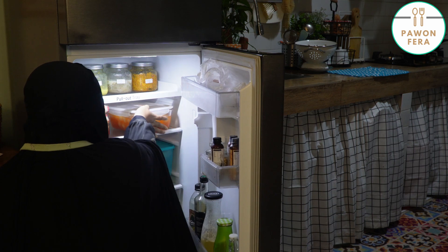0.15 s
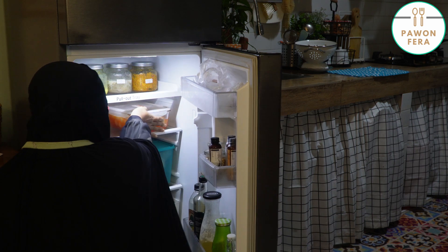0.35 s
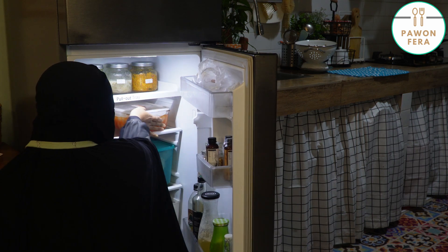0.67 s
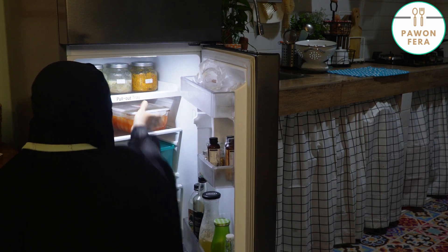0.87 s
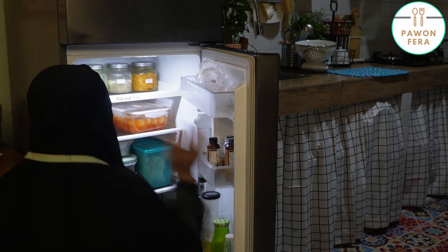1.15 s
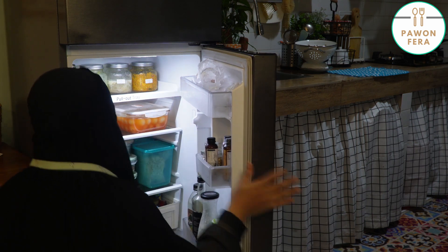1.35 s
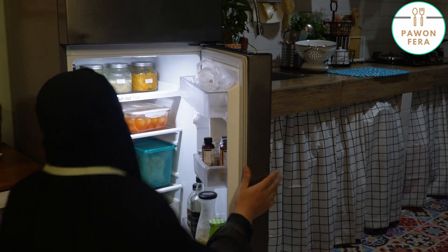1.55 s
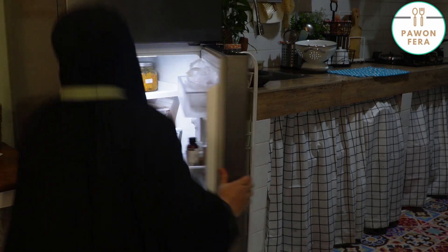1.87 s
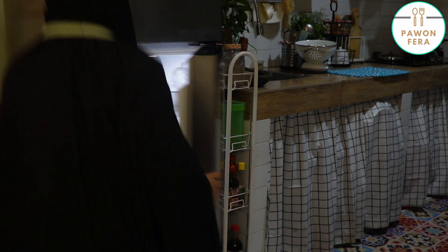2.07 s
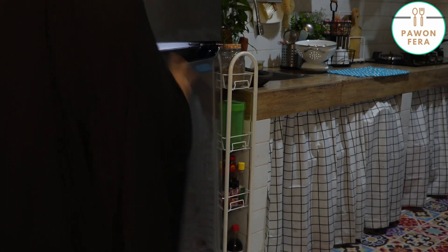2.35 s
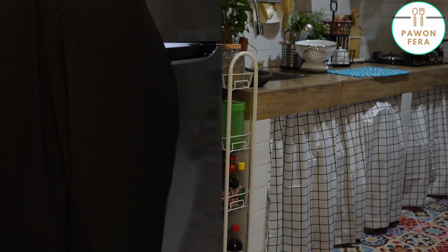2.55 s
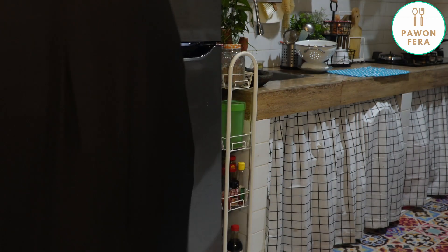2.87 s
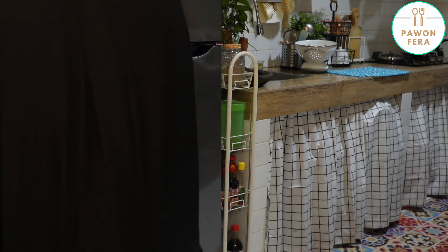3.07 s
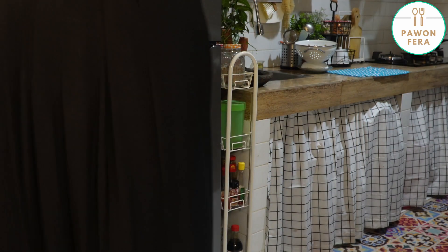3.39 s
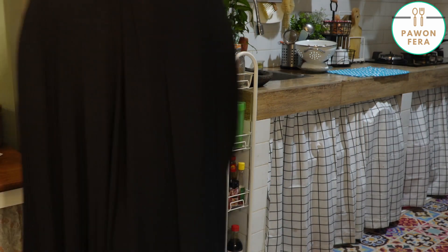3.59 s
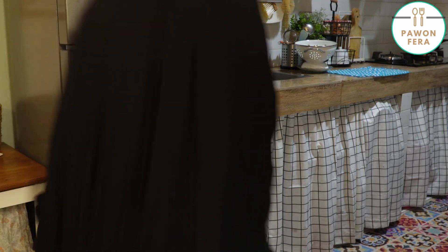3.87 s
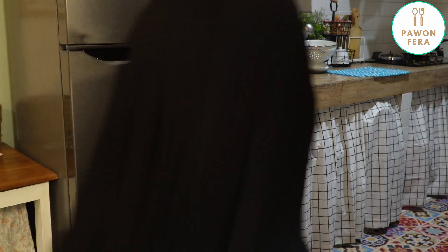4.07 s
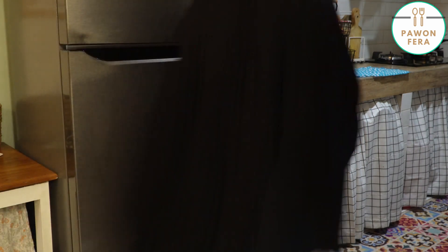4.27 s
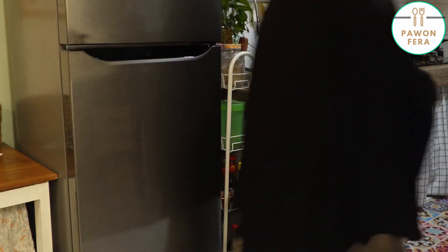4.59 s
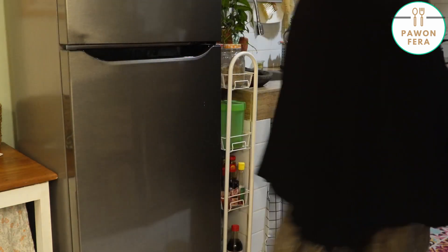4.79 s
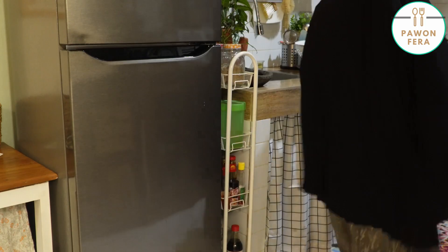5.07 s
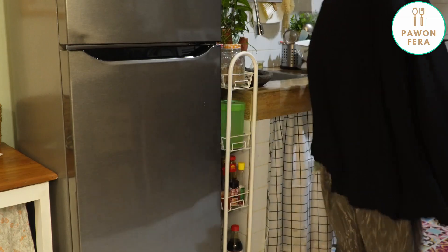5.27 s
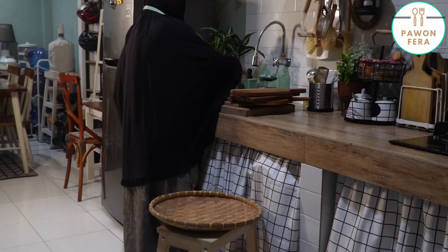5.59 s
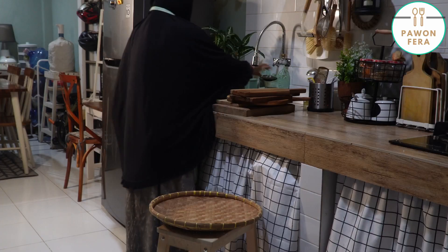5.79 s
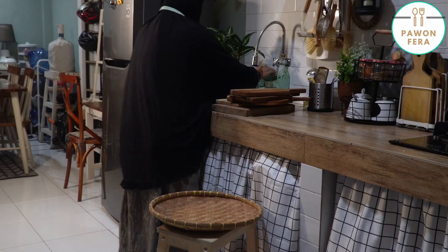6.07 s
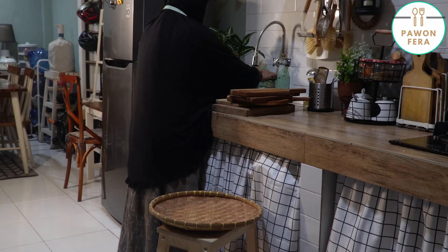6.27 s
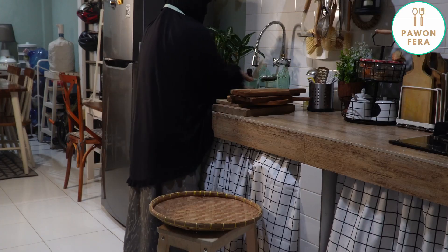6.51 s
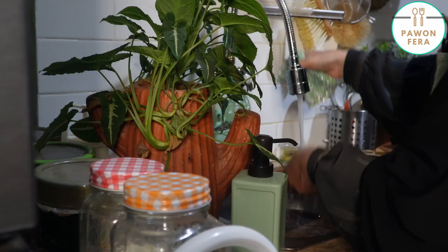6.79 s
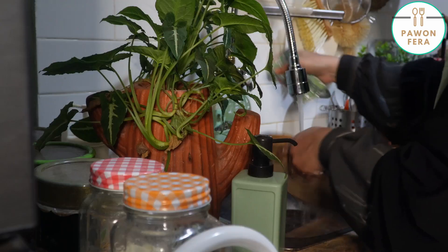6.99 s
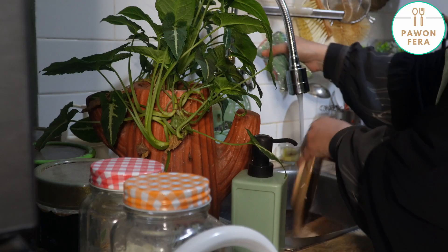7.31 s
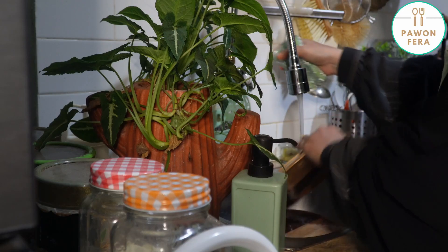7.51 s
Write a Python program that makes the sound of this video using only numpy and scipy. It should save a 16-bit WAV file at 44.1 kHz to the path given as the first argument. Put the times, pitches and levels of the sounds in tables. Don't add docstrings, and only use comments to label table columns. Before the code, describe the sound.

A plastic box knocks into a fridge, the door thuds shut, slippers scuff over kitchen tiles, then tap water runs and a wooden board knocks the sink.

```python
import sys
import numpy as np
from scipy import signal
from scipy.fft import rfft, irfft
from scipy.io import wavfile
from scipy.ndimage import uniform_filter1d

SR = 44100
rng = np.random.default_rng(int(sys.argv[2]) if len(sys.argv) > 2 else 0)


def invert_db(level):
    return 10 ** (np.asarray(level, dtype=float) / 20)


def materialize(psi):
    bounded = np.clip(np.atleast_2d(psi).T, -1, 1)
    quanta = np.round(bounded * 32767).astype(np.int16)
    wavfile.write(sys.argv[1], SR, quanta)


N = 337365
TIME = np.arange(N) / SR
DOOR_S, WIDE_S, SINK_S, END_S = 2.74, 5.47, 6.788, 7.65


def along(table, hz):
    points, values = np.transpose(table)
    return np.interp(np.log(np.maximum(hz, 1)), np.log(points), values)


def colour(x, table):
    size = 4096
    gain = invert_db(along(table, np.fft.rfftfreq(size, 1 / SR)))
    cepstrum = irfft(np.log(gain))
    cepstrum[1:size // 2] *= 2
    cepstrum[size // 2 + 1:] = 0
    response = irfft(np.exp(rfft(cepstrum)))
    return signal.fftconvolve(x, response)[:len(x)]


def band(x, hz, width):
    return signal.lfilter(*signal.iirpeak(min(hz, .45 * SR), hz / width, fs=SR), x)


def between(x, low_hz, high_hz):
    edges = [low_hz, min(high_hz, .49 * SR)]
    return signal.sosfilt(signal.butter(2, edges, "band", fs=SR, output="sos"), x)


def unit(x):
    return x / np.sqrt(np.mean(x ** 2) + 1e-30)


def walk(rate, count=N):
    hold = int(SR / rate)
    steps = np.repeat(rng.standard_normal(count // hold + 1), hold)
    smooth = uniform_filter1d(uniform_filter1d(steps, hold), hold)
    return unit(smooth[:count])


def add(out, x, s):
    start = int(s * SR)
    part = out[..., start:start + x.shape[-1]]
    part += x[..., :part.shape[-1]]


def panned(x, pan_db):
    return np.array([x * invert_db(pan_db / 2), x * invert_db(-pan_db / 2)])


def grit(rate, scatter_db):
    chance = rng.random((3, N))
    hit = chance[0] < rate / SR
    size = invert_db(-scatter_db * np.log(1.003 - chance[2]))
    return unit(hit * np.sign(chance[1] - .5) * size)


# pitch_hz, side_minus_mid_db
WIDTH = [(60, -21), (250, -20), (500, -15.5), (1000, -14), (2000, -12), (4000, -9), (8000, -6),
         (13000, -2.5)]


def spread(mid, side):
    side = colour(side, WIDTH)
    return np.array([mid + side, mid - side])


# pitch_hz, time_to_fall_60_db_s
ROOM_FADE = [(100, 0.46), (400, 0.44), (1500, 0.41), (5000, 0.38), (14000, 0.48)]


def room(send, build_s=0.00016):
    out, noise = 0, rng.standard_normal((2, N))
    build = np.exp(-1 / (build_s * SR))
    for hz in 45 * 2 ** np.arange(0, 8.7, 1 / 6):
        top_hz = hz * 2 ** (1 / 6)
        keep = 1e6 ** (-1 / (along(ROOM_FADE, hz) * SR))
        energy = between(send, hz, top_hz) ** 2
        decay = np.convolve([1, -keep], [1, -build])
        stored = signal.lfilter([(1 - keep) * (1 - build)], decay, energy)
        mid, side = unit(between(np.roll(noise, int(7 * hz), axis=1), hz, top_hz))
        field = mid + invert_db(along(WIDTH, hz)) * side * np.array([[1], [-1]])
        out = out + np.sqrt(np.abs(stored)) * field
    return out


# start_s, end_s, level_db
STILL_AIR = [
    (0, DOOR_S, -65),
    (DOOR_S, WIDE_S, -64),
    (WIDE_S, SINK_S, -62.5),
    (SINK_S, END_S, -69.5),
]
# pitch_hz, level_db (per Hz)
AIR_TONES = [
    [(15, -72), (25, -37), (248, -10), (307, -7), (371, -10), (654, -5), (1280, -2.5), (1510, -6),
     (1930, -3.5), (4450, -8), (15800, -26.5)],
    [(15, -50), (25, -33.5), (1090, 0.5), (1730, -4.5), (1980, -1), (2260, -3), (6310, -13), (15800, -26.5)],
    [(35, -61), (60, -12), (96, -25), (171, -5.5), (388, -10.5), (837, 1), (1270, 1), (1530, -2.5),
     (3160, 1.5), (15800, -24)],
]


def still_air():
    out = np.zeros((2, N))
    for (start, end, level_db), tone in zip(STILL_AIR, AIR_TONES + AIR_TONES[-1:]):
        count = int((end - start) * SR) + 1
        mid, side = (colour(rng.standard_normal(count), tone) for _ in range(2))
        level = invert_db(level_db + 0.12 * walk(17.0, count=count))
        add(out, level * unit(spread(mid, side)), start)
    return out


# pitch_hz, rms_db, waver_hz, start_s, end_s
HUM_LINES = [
    (330, -86.5, 7.77, 0.84, DOOR_S),
    (1290, -80.5, 10.4, 0.13, DOOR_S),
    (1040, -90, 10.2, 0.82, SINK_S),
    (48.4, -95.5, 0.23, WIDE_S, SINK_S),
    (147, -92.5, 7.3, WIDE_S, SINK_S),
    (861, -81.5, 25.8, WIDE_S, SINK_S),
    (1830, -91, 16, WIDE_S, SINK_S),
    (48.4, -86, .3, SINK_S, END_S),
    (158, -80, 10.9, SINK_S, END_S),
    (188, -80.5, 14.9, SINK_S, END_S),
]


def steady_hum():
    out = np.zeros(N)
    for hz, rms_db, waver_hz, start, end in HUM_LINES:
        phase = 2 * np.pi * (np.cumsum(hz + waver_hz * walk(30)) / SR + rng.random())
        level = np.sqrt(2) * invert_db(rms_db + min(.4 * waver_hz, 2) * walk(18))
        out += (TIME >= start) * (TIME < end) * level * np.sin(phase)
    return out


# start_s, length_s, pitch_hz, width_hz, level_db
RUBS = [(1.775, .06, 1800, 500, -57.5), (1.8, 0.094, 6050, 900, -51.5), (1.843, 0.051, 1500, 600, -52),
        (1.865, 0.065, 2400, 500, -62), (1.866, .25, 6300, 1200, -63.5), (1.937, .1, 1600, 600, -68.5),
        (2.075, 0.062, 2250, 500, -61.5), (2.16, .1, 2300, 900, -64), (3.547, 0.064, 2800, 1200, -54),
        (3.64, 0.026, 3500, 600, -52), (3.875, 0.036, 1710, 600, -54), (3.89, .05, 2200, 300, -58),
        (4.012, .07, 1980, 800, -57.5), (4.15, .06, 3270, 900, -53), (4.428, 0.046, 6800, 1530, -55.5),
        (4.533, 0.056, 1910, 500, -52), (4.538, 0.057, 5300, 1200, -48.5), (4.707, 0.054, 6100, 2500, -56),
        (5.021, 0.045, 7000, 3000, -52), (5.15, 0.046, 7600, 800, -54.5), (5.163, 0.043, 2940, 500, -52),
        (6.797, 0.25, 1680, 196, -64.5), (6.818, .15, 2750, 300, -59), (7.117, 0.18, 2640, 600, -46),
        (7.445, 0.3, 3270, 700, -51.5), (7.583, .07, 1730, 500, -69), (7.463, .18, 1924, 40, -58.5),
        (2.356, 0.034, 1900, 500, -62), (2.303, .1, 3200, 700, -65.5)]


def rubs():
    out, grains = np.zeros((2, N)), np.array([grit(7000, 4.0), grit(7000, 5.1)])
    for s, length_s, hz, width_hz, level_db in RUBS:
        part = grains[:, int(s * SR):int((s + length_s) * SR)]
        age = np.linspace(0, 1, part.shape[1])
        tone = unit(band(band(part, hz, width_hz), hz, width_hz))
        add(out, invert_db(level_db) * np.sin(np.pi * age ** 0.41) * tone, s)
    return spread(*out)


# start_s, pitch_hz, peak_db, time_to_fall_60_db_s
RINGS = [(.161, 922, -45, 0.11), (.178, 1600, -44, .1), (.178, 3110, -43, .12), (.334, 3000, -29, 0.16),
         (.333, 4600, -25, .06), (.334, 4040, -31, .2), (0.335, 214, -49, 0.39), (0.331, 1165, -22, 0.095),
         (0.333, 1630, -31, 0.15), (.334, 2190, -34, 0.26), (.334, 3460, -35, 0.27),
         (1.861, 1890, -58, 0.17), (2.09, 2200, -59, 0.14), (2.739, 408, -52, 0.18),
         (2.741, 312, -44, 0.16), (2.742, 470, -54, 0.27), (2.743, 932, -51, 0.34),
         (2.741, 1090, -53, 0.34), (2.743, 528, -46.5, 0.39), (2.992, 1163, -60, 0.22),
         (3.274, 1140, -63, .5), (3.305, 1153, -45.5, 0.42), (3.565, 2260, -52.5, 0.17),
         (3.791, 470, -60, 0.12), (3.83, 474, -60, 0.11), (3.868, 430, -62, 0.1),
         (5.161, 1573, -41.5, 0.22), (5.16, 1960, -38, 0.1), (5.163, 2980, -36.5, 0.16),
         (7.232, 264.2, -35, 0.46), (7.232, 465, -37.5, 0.14), (7.232, 861, -42, 0.34),
         (7.231, 1440, -32, 0.4), (7.232, 1800, -34, 0.3), (7.232, 2415, -34, .12), (7.232, 2940, -36, .1),
         (7.232, 3310, -37, .18), (7.232, 2180, -32, 0.15)]


def rings():
    out, t = np.zeros(N), np.arange(int(.6 * SR)) / SR
    for s, hz, db, t60 in RINGS:
        beat = invert_db(2.9 * walk(64.4, count=len(t)))
        tone = np.sin(2 * np.pi * hz * t + 0.67 * walk(42.6, count=len(t)))
        fade = 1000 ** (-t / t60) * (1 - np.exp(-t / 0.0024))
        add(out, invert_db(db) * beat * tone * fade, s)
    return panned(out, 1.3)


def door_hollow():
    start_s, level_db, t60_s, choke_s = 2.741, -36, .5, .18
    pitch_hz, rise_hz_per_s = 272, 400
    t = np.arange(int(.3 * SR)) / SR
    fade = 1000 ** (-t / t60_s) * (1 - np.exp(-t / 0.0024))
    shape = fade / (1 + np.exp((t - choke_s) / .006))
    flutter = 1 + 0.24 * np.cos(2 * np.pi * 20.0 * t + .3)
    boom = np.sin(2 * np.pi * (pitch_hz + rise_hz_per_s * t / 2) * t) * flutter
    out = np.zeros((2, N))
    add(out, panned(invert_db(level_db) * shape * boom, 1.1), start_s)
    return out


def blows(events, tone, crack_s, rattle, thin_hz):
    t = np.arange(int(.1 * SR)) / SR
    out = np.zeros((2, N))
    for s, peak_db, pan_db in events:
        shaking = rattle * rng.standard_normal(len(t)) * np.exp(-t / crack_s)
        crack = colour((t == 0) + shaking, tone)
        add(out, panned(invert_db(peak_db) * crack / np.abs(crack).max(), pan_db), s)
    return signal.sosfilt(signal.butter(2, thin_hz, "high", fs=SR, output="sos"), out)


# start_s, peak_db, left_minus_right_db
NUDGE = [
    (0.178, -29.5, 2.5),
    (0.196, -34, 2),
    (0.203, -38, 2),
]
# pitch_hz, level_db (per Hz)
NUDGE_TONE = [(47, -54), (80, -48), (230, -8), (300, -5), (380, -5.5), (461, -12), (1060, -7.5),
              (2140, -4.5), (5020, -10), (15000, -99)]


def nudge():
    return blows(NUDGE, NUDGE_TONE, crack_s=0.0033, rattle=0.17, thin_hz=130)


# start_s, peak_db, left_minus_right_db
BOX = [
    (.3265, -32, .5),
    (.3292, -15, .5),
    (.3322, -9.5, .5),
    (.3337, -8, .5),
    (.3362, -12, .5),
    (.3378, -23, .5),
    (.3445, -26, .5),
    (.349, -22.5, .5),
]
# pitch_hz, level_db (per Hz)
BOX_TONE = [(35, -61), (60, -42), (118, -33), (215, -4.5), (259, -5.5), (305, -10), (756, -9.5),
            (1790, 2.5), (2780, -7), (3420, 3), (15500, -40.5)]


def box():
    return blows(BOX, BOX_TONE, crack_s=0.0015, rattle=0.07, thin_hz=190)


# start_s, peak_db, left_minus_right_db
DOOR = [
    (2.7405, -27, 1),
    (2.7435, -30, 1),
    (2.751, -31, 1),
    (2.76, -30.5, 1),
    (2.775, -35, 1),
    (2.823, -38, 1),
]
# pitch_hz, level_db (per Hz)
DOOR_TONE = [(40, -26), (200, -14), (280, -15), (400, -1), (600, -8), (1110, -4), (2100, -9.5), (3830, -18),
             (15000, -46.5)]


def door():
    return blows(DOOR, DOOR_TONE, crack_s=0.0017, rattle=0.31, thin_hz=204)


# start_s, peak_db, left_minus_right_db
HEEL = [
    (3.312, -35, 1),
    (3.320, -22.5, 1),
    (3.326, -27.5, 0.91),
    (3.335, -44, 0.9),
]
# pitch_hz, level_db (per Hz)
HEEL_TONE = [(18, -70), (30, -29), (307, -6.5), (359, -7.5), (709, -6.5), (767, -7), (1200, 0.5),
             (1720, -3.5), (4540, 1.5), (15500, -37)]


def heel():
    return blows(HEEL, HEEL_TONE, crack_s=0.0041, rattle=0.16, thin_hz=166)


# start_s, peak_db, left_minus_right_db
BOARD = [
    (7.2308, -19, -.5),
    (7.2322, -8.5, -0.63),
    (7.2345, -19, -0.58),
    (7.2435, -15.5, -.5),
]
# pitch_hz, level_db (per Hz)
BOARD_TONE = [(40, -27), (180, -21), (270, -16), (700, -7), (1150, -3.5), (1500, 1.5), (2260, 3.5),
              (3200, -3), (5500, -16), (9000, -44), (15000, -41)]


def board():
    return blows(BOARD, BOARD_TONE, crack_s=0.0026, rattle=0.22, thin_hz=150)


# start_s, level_db
TAP = [
    (6.79, -46),
    (6.854, -48),
    (7.168, -44.5),
    (7.184, -43.5),
    (7.225, -41),
    (7.414, -47.5),
    (7.44, -42),
    (7.448, -43),
    (7.65, -47),
]
# pitch_hz, level_db (per Hz)
TAP_TONE = [(180, -56), (300, -12), (337, -20), (676, -17), (1040, -13), (1300, -12.5), (1660, -5.5),
            (2720, -1), (4550, 3), (9140, -5.5), (15800, -27)]


def stream(t, fizz):
    water = 0
    for hz in 250 * 2 ** np.arange(0, 6.1, .25):
        water = water + band(fizz, hz, hz / 5) * invert_db(3.8 * walk(40, count=len(t)))
    age = np.arange(300) / SR
    for at, pitch, size in rng.random((400, 3)):
        hz = 2000 * 6 ** pitch
        ping = np.sin(2 * np.pi * hz * age * (1 + 0.0186 * hz * age)) * np.exp(-hz * age / 10.0)
        add(water, invert_db(-1.5 + 6.0 * size) * ping, at * len(t) / SR)
    s, spray_db = np.transpose(TAP)
    water = unit(np.array([colour(part, TAP_TONE) for part in water]))
    return water * invert_db(np.interp(t, s, spray_db) + 0.5)


# start_s, peak_db, pitch_hz, length_s
SPLASHES = [(6.786, -31.5, 4860, 0.0041), (6.824, -37, 6500, 0.012), (6.895, -35, 9100, 0.0055),
            (6.97, -30, 5850, 0.0032), (6.979, -31, 4100, 0.0042), (6.98, -38, 8360, 0.01),
            (7.051, -35, 4120, 0.0047), (7.118, -48, 2500, .005), (7.141, -36, 4080, 0.0079),
            (7.185, -30.5, 4950, 0.0026), (7.267, -37, 11500, 0.0051), (7.33, -31, 3350, 0.0032),
            (7.433, -31, 6170, 0.0042), (7.505, -40.5, 13100, 0.0065), (7.614, -42, 6540, 0.0045)]


def splashes(t, fizz):
    out = np.zeros((2, len(t)))
    for at, peak_db, hz, length_s in SPLASHES:
        age = np.maximum(t - at, 0) / length_s
        burst = unit(band(band(fizz, hz, 0.4 * hz), hz, 0.41 * hz))
        out += invert_db(peak_db - 9.5) * np.sqrt(age) * np.exp(1 - age) * burst
    return out


def tap():
    t = np.arange(SINK_S * SR, N) / SR
    fizz = np.array([grit(14000, 2.5)[:len(t)] for _ in range(2)])
    out = np.zeros((2, N))
    add(out, spread(*(stream(t, fizz) + splashes(t, fizz))), SINK_S)
    return out * invert_db(np.array([[-.3], [.3]]))


# start_s, left_minus_right_db
WALKER = [
    (0, 2),
    (2.9, 14),
    (4.2, 0),
    (4.5, 1),
    (5.2, 0),
    (6.0, 14),
    (6.8, 8),
]
# start_s, peak_db, low_db, high_db
TICKS = [(0.1613, -46.5, 10.5, -44), (0.814, -50, -15, -16.5), (1.0178, -42.5, -25, -23),
         (2.9891, -62, 16, -9), (3.575, -40, -10, -13), (3.6358, -37.5, -0.5, -18), (3.656, -32.5, -31, -6),
         (3.791, -30, -13, -10), (3.8324, -33, -12, -15), (3.8644, -28, 0.5, -12),
         (4.0822, -25.5, -11.5, -11), (4.091, -30, -21, -20), (4.1395, -25.5, -22, -3),
         (4.141, -28, -17, -3), (4.4332, -31, -2, -11), (4.504, -26, -22, -29), (4.5331, -20.5, -9.5, -8),
         (4.54, -26, -7, -9), (4.6752, -26.5, -14, -26), (4.951, -31.5, 1.5, -28), (4.9528, -33.5, -1, -13),
         (5.1367, -31, -17, -15), (5.1576, -24.5, -14, -9), (5.161, -26.5, -10, -18),
         (5.167, -30, -18, -15), (6.0368, -38, -20, -25), (6.309, -40.5, -7, -14)]
# from_hz, to_hz
TICK_RANGES = [
    (2200, 5000),
    (330, 600),
    (1000, 2200),
    (5000, 9000),
]


def ticks():
    thump_db = -24.5
    out, t = np.zeros((2, N)), np.arange(1200) / SR
    for s, peak_db, low_db, high_db in TICKS:
        click = (t == 0) + 0.39 * rng.standard_normal(len(t)) * np.exp(-t / 0.00079)
        parts = [between(between(click, *edges), *edges) for edges in TICK_RANGES]
        levels_db = [0, low_db + thump_db, low_db, high_db]
        tick = sum(invert_db(db) * part / np.abs(part).max() for db, part in zip(levels_db, parts))
        pan_db = np.interp(s, *np.transpose(WALKER))
        add(out, panned(invert_db(peak_db - 5.0) * tick, pan_db), s)
    return out


def planted(t, length_s):
    attack_s, release_s = 0.0011, 0.0026
    return np.minimum(t / attack_s, 1) * np.exp(-np.maximum(t - length_s, 0) / release_s)


def pulled(t, length_s):
    return np.sin(np.pi * np.minimum(t / length_s, 1)).clip(0) ** 0.96


# pitch_hz, width_hz
SOLE_RANGES = [
    (3600, 2600),
    (1920, 1550),
    (6300, 2700),
    (9500, 6800),
]
# start_s, length_s, level_db, drag_db, grit_db (last two over the sole)
PLANTS = [(0.0, 0.018, -57.5, 6, -21), (1.18, 0.13, -61, -7, -19), (1.85, 0.045, -47, 0.5, -24),
          (2.08, 0.022, -56, 4, -4), (2.18, 0.024, -55.5, 3.5, -9), (2.46, 0.028, -46, -31, -10),
          (2.595, 0.034, -48, -12, -12), (3.565, 0.044, -46, -1.5, -22), (3.79, 0.086, -46, -8, -5),
          (3.866, 0.051, -50, 2, 0), (4.083, .05, -42.5, -10, -12), (4.14, 0.047, -40, -5, -4.5),
          (4.433, 0.052, -48, 3.5, -6), (4.503, 0.026, -36.5, -9, -8.5), (4.534, 0.023, -42.5, 7, 0),
          (4.675, 0.033, -47, -1.5, -19), (4.951, 0.025, -50, 8.5, 0), (5.134, 0.026, -44.5, 2, 1),
          (5.157, 0.008, -33, -1.5, -15), (5.47, 0.031, -49.5, -17, -12), (5.945, 0.07, -57, -4, -12),
          (6.032, 0.015, -49.5, -1, -18), (6.3, 0.014, -52.5, -2.5, -5.5)]
# start_s, length_s, level_db, drag_db, grit_db
SLIDES = [(0.024, 0.27, -63, 1, -12), (1.62, 0.19, -61.5, 2.5, -11), (1.744, 0.1, -54, 4, -2.5),
          (1.77, 0.12, -62.5, -3, 11.5), (1.87, 0.22, -60, 5, -3), (1.95, 1, -57.5, -1.5, -12),
          (2.94, 0.047, -64, -1, -14), (3.297, 0.068, -59, 20, -19), (3.49, 0.088, -53.5, -6, -26),
          (3.598, 0.085, -49.5, -2, 0), (3.717, 0.055, -52.5, -3, 1), (3.904, 0.2, -49, -3, -2),
          (4.172, 0.085, -51.5, -3, -2), (4.514, 0.3, -49, 0.5, -9.5), (4.698, 0.067, -48.5, -14, 0.5),
          (4.97, 0.07, -52.5, 2, -1), (5.008, 0.088, -46, 2, 1), (5.197, 0.26, -60.5, -4, -6),
          (5.5, 0.085, -50.5, -11, -6), (5.597, 0.37, -63, -2, -8.5), (6.05, 0.15, -69, 3, -8),
          (6.235, 0.17, -64.5, -4, 0), (6.58, 0.17, -74, 9, -17)]


def slippers():
    layers = []
    for hz, width_hz in SOLE_RANGES:
        scrape = band(band(grit(9000, 4.6), hz, width_hz), hz, 1.38 * width_hz)
        layers.append(unit(scrape) * invert_db(0.32 * walk(40)))
    power = np.zeros((4, N))
    for table, motion in ((PLANTS, planted), (SLIDES, pulled)):
        for s, length_s, level_db, drag_db, grit_db in table:
            t = np.arange(int((length_s + .15) * SR)) / SR
            speed = motion(t, length_s)
            dust_db = -6.5 + grit_db + 6 * (speed ** 2 - 1)
            parts_db = np.array(np.broadcast_arrays(0, drag_db, grit_db, dust_db))
            add(power, (invert_db(level_db + parts_db) * speed) ** 2, s)
    out = invert_db(-11.0) * between(np.sum(np.sqrt(power) * layers, axis=0), 300, 15000)
    pan_db = 0.61 * np.interp(TIME, *np.transpose(WALKER))
    return spread(out, np.roll(out, 90)) * invert_db(np.array([pan_db, -pan_db]) / 2)


def scene():
    sources = [(rubs(), 1.5), (rings(), -9), (door_hollow(), -9.5),
               (nudge(), 8), (box(), 6.5), (door(), 6), (heel(), 8), (board(), -3.0),
               (tap(), -4), (ticks(), 1.5), (slippers(), 5)]
    send = sum(invert_db(room_db) * direct.mean(axis=0) for direct, room_db in sources)
    return sum(direct for direct, _ in sources) + room(send) + still_air() + steady_hum()


def low_pass(x):
    return signal.sosfilt(signal.butter(12, 15780, fs=SR, output="sos"), x)


def record(dry):
    bright = band(dry, 8500, 6800)
    ports = dry + 0.13 * np.array([[-1], [1]]) * bright
    cut = signal.sosfilt(signal.ellip(8, .3, 60, 15700, fs=SR, output="sos"), ports)
    return low_pass(cut)


dry = scene()
out = record(dry)
materialize(out)
```